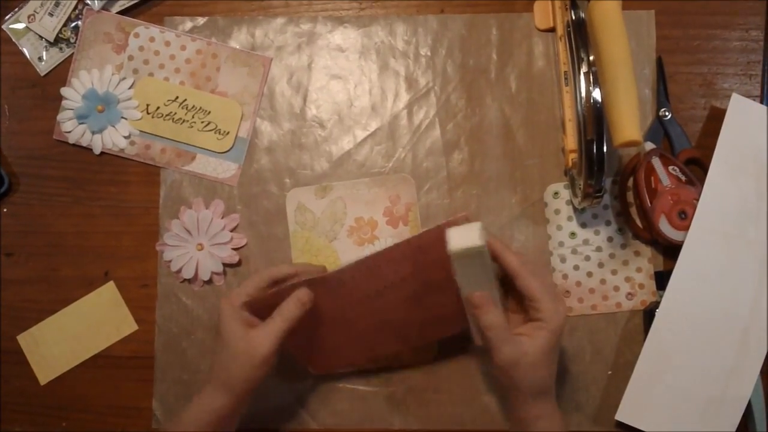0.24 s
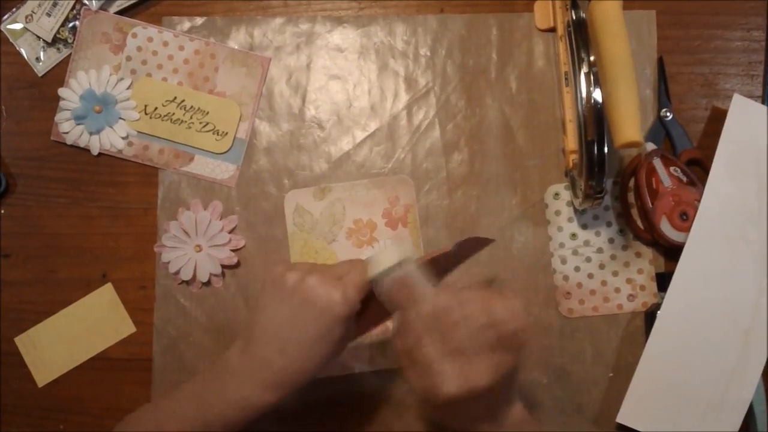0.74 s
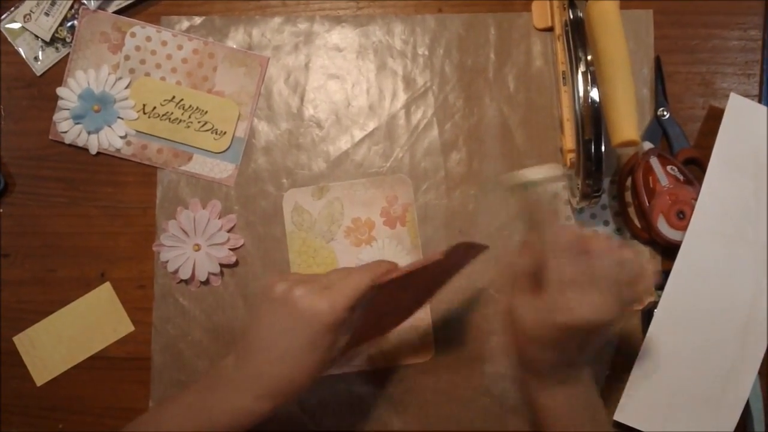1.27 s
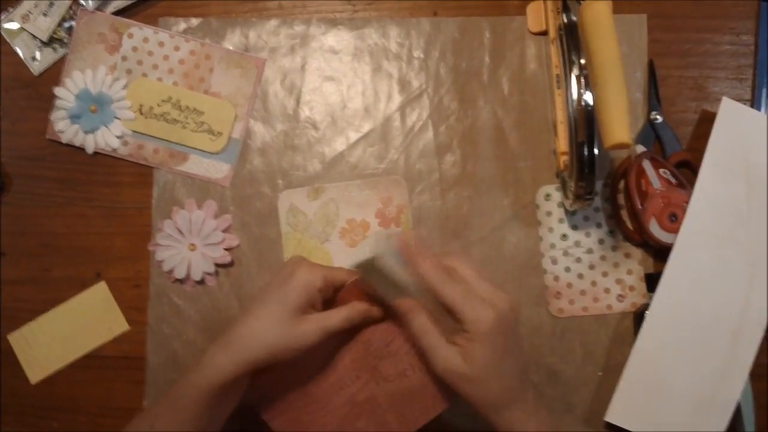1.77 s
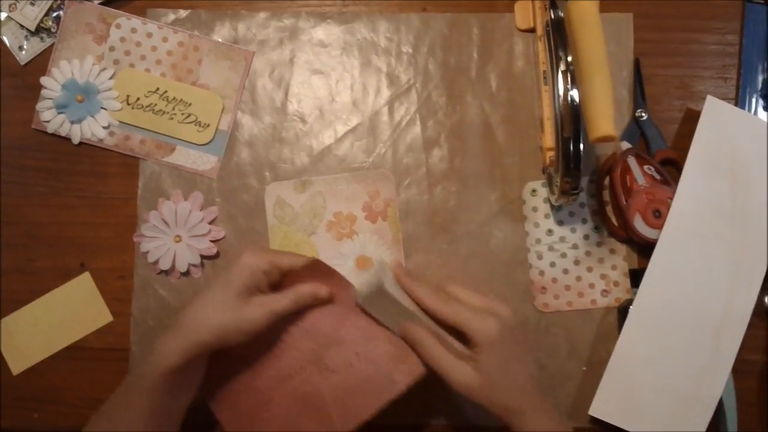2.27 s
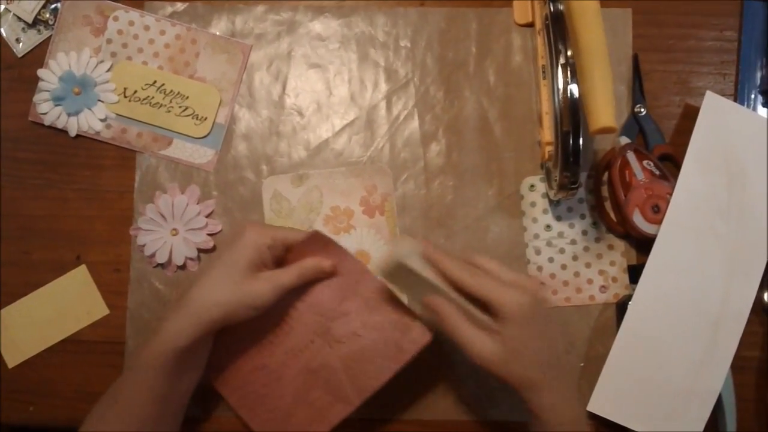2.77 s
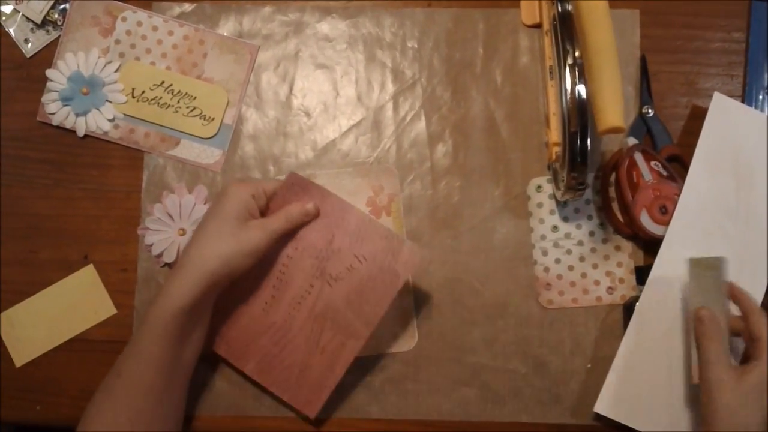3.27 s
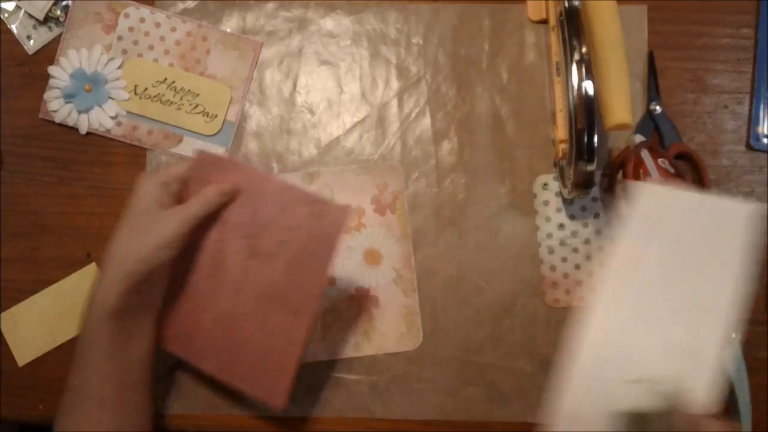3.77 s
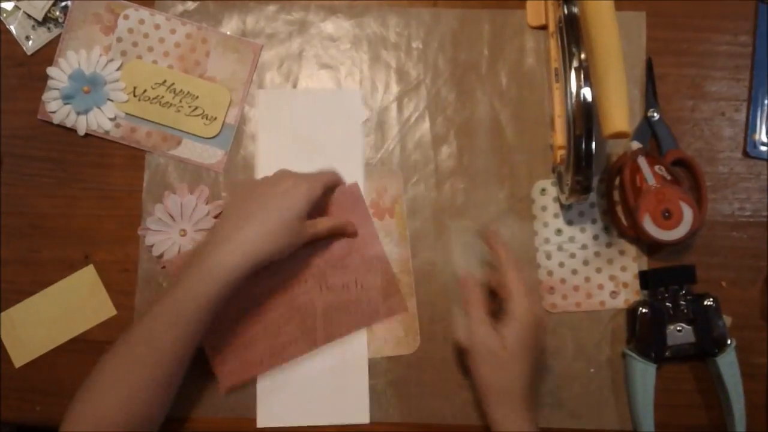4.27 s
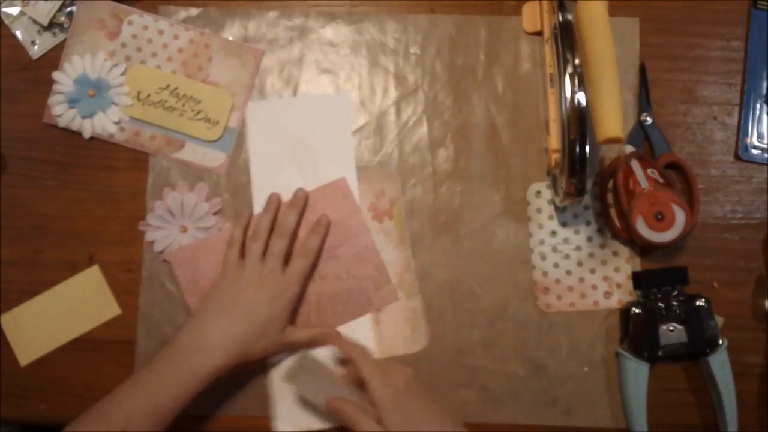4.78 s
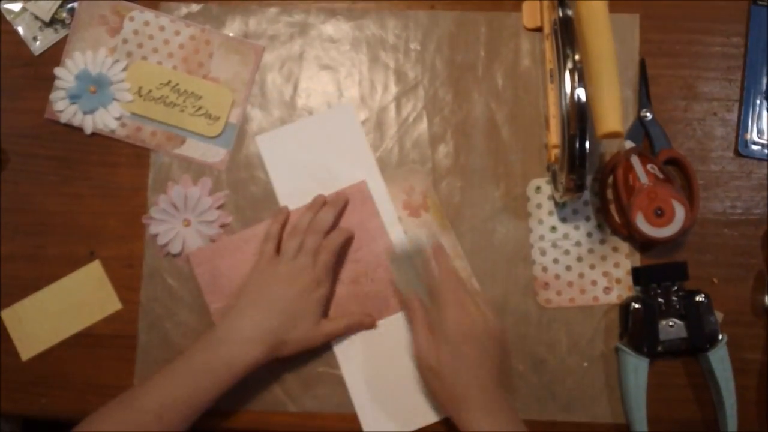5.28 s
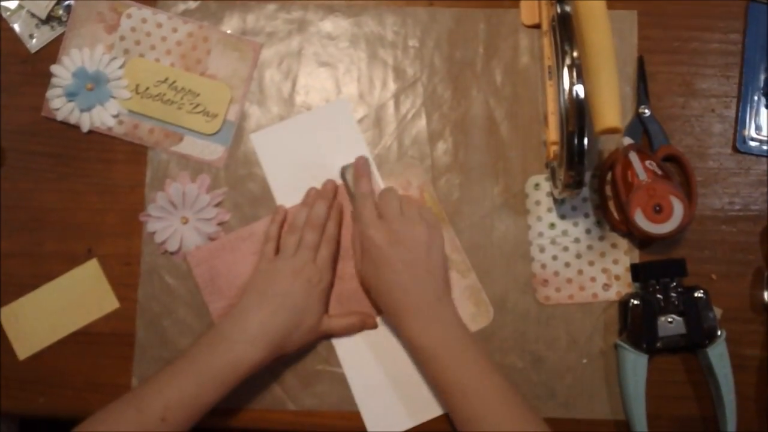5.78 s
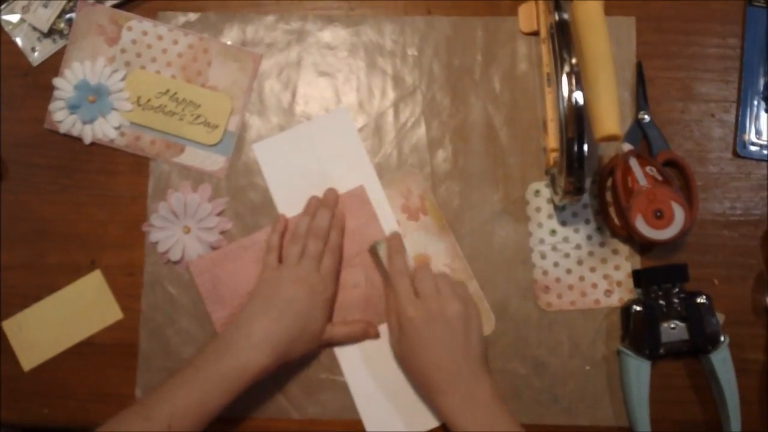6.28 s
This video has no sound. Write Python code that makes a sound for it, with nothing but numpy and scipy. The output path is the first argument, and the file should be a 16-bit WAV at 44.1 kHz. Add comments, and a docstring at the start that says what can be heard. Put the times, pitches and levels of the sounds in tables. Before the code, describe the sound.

Six quick gritty scrubs of a sanding block on card, a sharp snap, four long rasping swipes, paper shuffling, then steady back-and-forth sanding.

```python
"""A craft table in a small, faintly humming room, close to a mono microphone. Fingers slide on cardstock and
paper rustles; a sanding block gives six quick scrubs, then four long swipes to the edge of the card held in air.
A paper strip is fetched and laid down, then the card is pressed flat and sanded back and forth.
Rubbing is a dense rain of grit clicks through the card's resonances; flicks and knocks are dying modes,
paper ticks short noise puffs. Room reflections, gentle gain control and a treble notch follow."""
import sys
import numpy as np
from scipy import signal
from scipy.fft import rfft, irfft
from scipy.io import wavfile
from scipy.ndimage import uniform_filter1d

SR = 44100
rng = np.random.default_rng(int(sys.argv[2]) if len(sys.argv) > 2 else 0)


def int16_out(signal):
    """Quantize to a 16-bit WAV file."""
    q = np.round(np.clip(np.atleast_2d(signal).T, -1, 1) * 32767)
    wavfile.write(sys.argv[1], SR, q.astype(np.int16))


N = 288414
TIME = np.arange(N) / SR  # s
HZ = np.fft.rfftfreq(4096, 1 / SR)  # frequency grid of the colouring filters

# Event levels are source settings, ahead of the room and the gain control.
# Steady room noise, relative spectrum: hz, level_db
ROOM_NOISE_COLOUR = [(15, -29), (25, -21.5), (101, -2), (289, 0), (433, -7), (523, -3), (722, -7),
                     (804, -7.5), (1710, -15), (1900, -16.5), (2360, -15.5), (2560, -17.5), (6050, -20),
                     (12800, -29), (15500, -32)]
# Room hum: pitch_hz, level_db (rms)
HUM_TONES = [(120, -57.5), (258, -63.5)]
# Dying time of the room by band: hz, t60_s
ROOM_DECAY = [(150, 0.23), (1000, 0.3), (2500, 0.4), (4500, 0.29), (9000, 0.22), (15000, 0.087)]
# Near reflections from the table and walls: delay_s
REFLECTION_DELAYS = [.0023, .0041, .0067, .0094, .0122, .0153]

# Soft knocks of the block: start_s, knock_db, table_boom_db, grit_db
BLOCK_KNOCKS = [(1.2, -28.5, -62, -48), (1.777, -31.5, -56, -34.5), (1.888, -27.5, -58, -44),
                (1.963, -35, -65, -30.5), (2.123, -33, -70, -40.5), (2.461, -32.5, -60, -35),
                (2.665, -32.5, -52, -26.5), (3.299, -34, -50, -49), (3.608, -21, -45, -43),
                (3.6301, -27.5, -46, -55), (3.6426, -28, -47, -50), (3.717, -36, -46, -42.5),
                (5.343, -53, -33, -32)]
# Modes of a block knock: pitch_hz, level_db (relative), t60_s
BLOCK_MODES = [(221, -12.5, 0.077), (361, 5.5, 0.019), (483, -10, 0.052), (573, -1, 0.024),
               (770, 0.5, 0.016), (1020, -10.5, 0.074), (1470, -21, .035), (1990, -17, .03)]

# Fingers and paper slide: start_s, attack_s, hold_s, hiss_db, body_db
FINGER_SLIDES = [(0.17, 0.1, 0.12, -51, -53.5), (0.413, .005, 0.014, -48, -63),
                 (0.495, 0.026, 0.07, -47, -54), (1.489, 0.012, 0.1, -49, -61),
                 (1.62, 0.037, 0.11, -56, -53.5), (4.708, 0.015, .245, -46, -56.5),
                 (4.95, 0.024, 0.058, -52, -57), (5.051, 0.019, 0.28, -58, -69)]
# Card and paper strip are shifted: start_s, attack_s, hold_s, hiss_db, body_db
PAPER_SHUFFLES = [(3.285, .008, .035, -51, -41.5), (3.439, 0.029, 0.024, -54.5, -44.5),
                  (3.53, 0.055, 0.074, -66, -48), (3.69, 0.018, 0.037, -72, -52.5),
                  (3.965, 0.0086, 0.028, -51, -52.5), (4.045, 0.022, 0.048, -52.5, -54),
                  (4.243, 0.01, 0.038, -48.5, -52)]
# Paper crackles faintly while handled: start_s, end_s, faintest_level_db
PAPER_RUSTLES = [(0.199, 0.602, -60), (1.514, 1.759, -58), (3.417, 4.203, -57.5)]
# Paper edge catches and ticks: start_s, level_db, pitch_hz, width_hz, time_constant_s
PAPER_TICKS = [(.193, -46, 7000, 3500, .003), (0.33, -32, 5940, 2380, 0.0028),
               (0.598, -39.5, 6600, 3000, .004), (0.663, -41, 1800, 1500, 0.0037),
               (.689, -29.5, 7500, 1500, 0.0036), (1.061, -29, 1500, 5000, 0.0076),
               (1.555, -45, 4500, 3000, 0.0026), (1.648, -43, 3000, 3440, .003),
               (2.438, -46, 5000, 3000, .002), (2.853, -40, 3400, 1200, .002),
               (3.347, -48, 6000, 4000, .002), (3.484, -39, 2200, 3000, .003),
               (3.888, -48, 5000, 3000, .002), (3.972, -41.5, 1300, 900, 0.0056),
               (4.689, -37, 4080, 600, 0.0016), (4.698, -31.5, 4170, 700, 0.00065)]
# Card flicks: start_s, ring_db, pitch_factor (from the free length), crack_db
CARD_FLICKS = [(0.599, -21.5, 0.93, -48), (.920, -24, 2, -38), (1.198, -4.5, 1.02, -12.5),
               (1.8467, -9.5, 0.52, -18.5), (3.047, -24.5, 1.16, -32), (3.278, -37, 0.93, -35),
               (3.287, -21, 0.93, -31), (4.078, -20, 0.88, -35.5), (4.2523, -23.5, 1, -28)]
# Modes of a flicked card: pitch_hz, level_db (relative), t60_s
CARD_MODES = [(845, -33, 0.012), (1140, 1.5, 0.011), (1760, 1.5, 0.0034), (2450, -0.5, 0.0022),
              (2800, -2.5, 0.0031)]

# Quick scrubs in the air: start_s, attack_s, hold_s, hiss_db, body_db, pitch_factor
QUICK_SCRUBS = [(0.659, 0.023, 0.06, -41.5, -44, 1.01), (0.757, 0.03, .068, -34, -39, 1.015),
                (0.862, 0.017, 0.054, -37.5, -40.5, 0.99), (0.961, 0.019, 0.059, -30.5, -37.5, 1.025),
                (1.048, 0.028, 0.057, -33.5, -37.5, 1.02), (1.143, 0.035, 0.037, -24.5, -32.5, 1.05)]
# Long swipes off the edge: start_s, attack_s, hold_s, hiss_db, body_db, freedom (to resonate), pitch_factor
LONG_SWIPES = [(1.809, 0.058, .078, -24.5, -29, 0.57, 1.15), (2.144, 0.044, 0.12, -27, -28.5, 1.05, 1.05),
               (2.49, .036, .135, -27.5, -31.5, 0.78, 1.09), (2.861, 0.051, .16, -30.5, -33.5, 0.52, 1.08)]
# Strokes on the flat card: start_s, length_s, fastest_at (share of length), hiss_db, body_db,
# freedom (to resonate), pitch_factor
FLAT_SANDING = [(5.343, 0.098, 0.16, -32, -42, 0.88, 1.12), (5.431, 0.17, 0.35, -29, -38.5, 1.12, 1.07),
                (5.577, 0.2, 0.49, -27.5, -37, 1.14, 1.07), (5.767, 0.16, 0.42, -27, -35.5, 0.8, 1.05),
                (5.914, 0.17, .49, -26.5, -37, 0.74, 1.08), (6.068, 0.19, 0.53, -27, -36, .83, 1.02),
                (6.237, 0.21, 0.51, -26, -38.5, 0.6, 1.04), (6.43, .19, 0.48, -28.5, -36.5, 0.57, 1.04)]
# Colour of each kind of rubbing, relative spectrum: hz, level_db
SCRUB_SPECTRUM = [(200, -18), (700, -7.5), (1000, -8), (1350, 0.5), (2200, -3.5), (4000, -1.5), (7000, -8),
                  (9600, -3), (11000, -12), (15000, -21)]
# Same for the swipes: hz, level_db
SWIPE_SPECTRUM = [(150, -20), (400, -6.5), (900, 2.5), (2200, -0.5), (4000, -2.5), (6000, -4), (8300, 0.5),
                  (9200, -3), (10500, -3), (12000, -15), (15000, -17.5)]
# Same for the flat strokes: hz, level_db
FLAT_SPECTRUM = [(200, -34), (700, -17), (1250, -6.5), (2000, -8), (4500, 1), (6000, 3.5), (8000, 2),
                 (10200, 1.5), (11500, -6.5), (15000, -13)]
# Same for sliding fingers and paper: hz, level_db
SLIDE_SPECTRUM = [(500, -2.5), (2000, -5.5), (4000, -8), (7000, -4), (10000, -8), (12000, -20),
                  (15000, -21)]
# Same for shifted card and paper: hz, level_db
SHUFFLE_SPECTRUM = [(150, -29), (400, 4), (1100, 1), (2000, -5.5), (3300, -7), (5000, -12), (9000, -6.5),
                    (12000, -22), (15000, -25)]
# Card resonances in the scrubbing grip, before freedom and pitch factor: pitch_hz, width_hz, lift_db
SCRUB_RESONANCES = [(1560, 480, 6), (2410, 260, 7), (4460, 250, 8), (5550, 720, 13), (7420, 550, 13.5),
                    (8600, 550, 10.5), (9240, 680, 4.5)]
# Same in the swiping grip: pitch_hz, width_hz, lift_db
SWIPE_RESONANCES = [(650, 180, 8), (1700, 180, 2.2), (3090, 740, 8.8), (4070, 280, 3.1), (5190, 1900, 10.2),
                    (7300, 270, 2.5)]
# Same pressed flat: pitch_hz, width_hz, lift_db
FLAT_RESONANCES = [(1460, 160, 3.5), (2434, 560, 10.6), (3500, 360, 3.4), (5730, 200, 1.7),
                   (7450, 280, 2.6)]

ROOM_NOISE_DB = -50  # rms
BOOM_HZ, BOOM_T60_S = 148.4, 0.29
TURN_BOOM_DB = -46  # each turn of the block nudges the table
RUSTLES_PER_S, RUSTLE_RANGE_DB = 20, 15
CROSSOVER_HZ = 3000  # card body below, grit hiss above
SCRUB_FREEDOM = 0.73  # factor on the resonance lifts of the held card
HISS_POWER = 1.52  # hiss grows as this power of the block's speed
BODY_SPEED = 0.44  # share of top speed where the card body nears its full level
SANDING_GAIN_DB = 1.05  # added to the hiss and body levels of all sanding
DUCK_ABOVE_DB, DUCK_SHARE, RECOVER_DB_PER_S = -32.5, 0.24, 4  # the recorder's gain control
NOTCH_HZ, NOTCH_HALF_WIDTH_HZ = 12550, 380  # half amplitude this far from the centre
BAND_LIMIT_HZ = 15600


def amp(db):
    """Decibels to gain."""
    return 10 ** (np.asarray(db) / 20)


def unit(x):
    """Scales to rms 1."""
    return x / np.sqrt(np.mean(x ** 2) + 1e-20)


def read(points, hz):
    """Reads a spectrum on a log-frequency axis."""
    f, value = np.transpose(points)
    return np.interp(np.log(hz + 1), np.log(f), value)


def add(mix, s, sound):
    """Mixes a sound in at time s, cut at the end of the mix."""
    part = mix[round(s * SR):][:len(sound)]
    part += sound[:len(part)]


def colour(x, curve_db):
    """Causal (minimum-phase) filter with the given gain over HZ."""
    log_gain = np.log(amp(np.r_[curve_db, curve_db[-2:0:-1]]))
    taps = np.fft.ifft(np.exp(np.conj(signal.hilbert(log_gain)))).real
    return signal.oaconvolve(x, taps)[:len(x)]


def high_pass(x, hz):
    """Gentle cut of what a small source hardly radiates."""
    return signal.sosfilt(signal.butter(2, hz, "high", fs=SR, output="sos"), x)


def wander(n, hz):
    """Random motion fading above the given rate; one second of rms 1, repeated as needed."""
    f = np.fft.rfftfreq(SR, 1 / SR)
    motion = irfft(rfft(rng.standard_normal(SR)) / (1 + (f / hz) ** 2))
    return np.resize(unit(motion), n)


def ring(modes, pitch=1):
    """Dying modes after one blow, neighbours in opposite sense; little radiates below the lowest."""
    t = TIME[:SR // 3]
    motion = np.zeros(len(t))
    for k, (hz, db, t60) in enumerate(modes):
        decay = np.exp(-np.log(1000) * t / t60)
        motion += (-1) ** k * amp(db) * decay * np.sin(2 * np.pi * hz * pitch * t)
    return high_pass(motion / 2, 0.69 * modes[0][0] * pitch)


def burst(hz, width_hz, decay):
    """A short puff of crackle round one frequency; paper radiates no bass."""
    t = TIME[:SR // 8]
    band_db = -20 * np.log10(1 + ((HZ - hz) / width_hz) ** 2)
    noise = colour(rng.standard_normal(len(t) * 2), band_db)[len(t):]  # skips the filter's onset
    puff = high_pass(noise * np.exp(-t / decay), 220)
    return unit(puff) * np.sqrt(decay / 2 / t[-1])  # energy follows the decay time


def crack():
    """Fibres let go over a few milliseconds; total energy equals rms 1 held for one millisecond."""
    t = TIME[:512]
    fibres = rng.choice([-1., 1.], len(t)) * np.exp(-t / 0.0028)
    spectrum = [(200, -34), (1200, 9.5), (3400, 8), (6000, 4.0), (10000, -10.0), (15000, -36)]  # (Hz, dB)
    click = colour(fibres, read(spectrum, HZ))
    return click / np.linalg.norm(click) * np.sqrt(SR / 1000)


def push(attack, hold, hiss_db, body_db, hiss_sag_db_per_s, body_sag_db_per_s, release_db_per_s):
    """Hiss and body envelopes of a one-way stroke: it speeds up, the pressure eases, the contact lifts off."""
    t = TIME[:round((hold + 40 / release_db_per_s) * SR)]
    contact = np.minimum(t / attack, 1) * amp(-release_db_per_s * np.maximum(t - hold, 0))
    hiss = contact * amp(hiss_db - hiss_sag_db_per_s * t)
    body = contact * amp(body_db - body_sag_db_per_s * t)
    return hiss, body


def swing(length, fastest, hiss_db, body_db):
    """Hiss and body envelopes of a stroke between two turning points: the speed follows one skewed arch."""
    u = np.arange(0, length, 1 / SR) / length
    skew = np.log(.5) / np.log(np.clip(fastest, .1, .9))  # puts the top of the arch at this share
    speed = np.abs(np.sin(np.pi * u ** skew))
    hiss = amp(hiss_db) * speed ** HISS_POWER
    body = amp(body_db) * np.tanh((speed / BODY_SPEED) ** 2)
    return hiss, body


def rub(envelopes, shape, grains_per_s, spread_db, chatter_db, chatter_hz, patchy_db,
        modes=(), freedom=1, pitch=1):
    """Grit snags and frees paper fibres: dense tiny clicks give a hiss and ring the card."""
    hiss_gain, body_gain = envelopes
    n = len(hiss_gain)
    sizes = rng.choice([-1., 1.], n) * amp(spread_db * np.minimum(rng.exponential(1, n), 4))
    snags = sizes * (rng.random(n) < grains_per_s / SR)
    snags *= amp(chatter_db * wander(n, chatter_hz))  # the contact catches and slips unevenly
    hz, _, z = signal.stft(colour(snags, read(shape, HZ)), SR, nperseg=512)
    hz = hz[:, None]
    card_db = freedom * sum(lift / (1 + (2 * (hz - f * pitch) / width) ** 2) for f, width, lift in modes)
    # the colour shifts as the contact travels along the edge
    patches = uniform_filter1d(rng.standard_normal(z.shape), size=7, axis=0)  # across frequency
    patches = unit(uniform_filter1d(patches, size=8, axis=1))  # across time
    z = z * amp(card_db + patchy_db * patches)
    low = 1 / (1 + (hz / CROSSOVER_HZ) ** 10)
    body = unit(signal.istft(z * low, SR, nperseg=512)[1][:n])
    hiss = unit(signal.istft(z * (1 - low), SR, nperseg=512)[1][:n])
    return hiss_gain * hiss + body_gain * body


def background():
    """Steady coloured room noise and hum tones whose phase wavers slightly."""
    air = unit(colour(rng.standard_normal(N), read(ROOM_NOISE_COLOUR, HZ)))
    hum = np.zeros(N)
    for hz, db in HUM_TONES:
        phase = 2 * np.pi * hz * TIME + 0.66 * wander(N, 13)
        hum += amp(db) * np.sqrt(2) * np.sin(phase)
    return amp(ROOM_NOISE_DB) * air + hum


def reflections(x):
    """A few near reflections of alternating sign, each an equal share of the sound's energy."""
    out = np.zeros(N)
    for k, s in enumerate(REFLECTION_DELAYS):
        add(out, s, (-1) ** k * x)
    return out / np.sqrt(len(REFLECTION_DELAYS))


def room(x):
    """The tail of the small room: sparse random echoes dying band by band."""
    t = TIME[:SR // 2]
    echoes = rng.choice([-1., 1.], len(t)) * (rng.random(len(t)) < 4000 / SR)  # 4000 per second
    echoes = echoes * (t > .006)
    hz, frame_s, z = signal.stft(echoes, SR, nperseg=256)
    decay = np.exp(-np.log(1000) * frame_s / read(ROOM_DECAY, hz)[:, None])
    tail = signal.istft(z * decay, SR, nperseg=256)[1][:len(t)]
    return signal.fftconvolve(x, tail / np.linalg.norm(tail))[:N]


def table():
    """The table top booms as one dying mode under landings, and faintly whenever the block turns round."""
    boom = np.minimum(TIME / 0.008, 1) * amp(-60 * TIME / BOOM_T60_S) * np.sin(2 * np.pi * BOOM_HZ * TIME)
    out = np.zeros(N)
    for s, _, boom_db, _ in BLOCK_KNOCKS:
        add(out, s, amp(boom_db) * boom)
    for s, *_ in FLAT_SANDING[1:]:
        add(out, s, amp(TURN_BOOM_DB) * boom)
    return out


def knocks():
    """The block lands: a dull knock of dying modes and a scratch of grit."""
    out = np.zeros(N)
    for s, knock_db, _, grit_db in BLOCK_KNOCKS:
        add(out, s, amp(knock_db) * ring(BLOCK_MODES))
        add(out, s, amp(grit_db) * burst(1900, 4000, 0.0016))
    return out


def handling():
    """Fingers slide on the card; the paper strip is lifted, rustles and is dragged across the table."""
    out = np.zeros(N)
    for s, *move in FINGER_SLIDES:
        envelopes = push(*move, hiss_sag_db_per_s=2.5, body_sag_db_per_s=10, release_db_per_s=262.5)
        add(out, s, rub(envelopes, SLIDE_SPECTRUM, grains_per_s=12000, spread_db=2.5,
                        chatter_db=1.9, chatter_hz=50, patchy_db=2.6))
    for s, *move in PAPER_SHUFFLES:
        envelopes = push(*move, hiss_sag_db_per_s=15, body_sag_db_per_s=18, release_db_per_s=153.5)
        add(out, s, rub(envelopes, SHUFFLE_SPECTRUM, grains_per_s=3000, spread_db=3.0,
                        chatter_db=0.4, chatter_hz=60, patchy_db=-2.0))
    for start, end, faintest_db in PAPER_RUSTLES:
        for when, size, pitch in rng.random((round(RUSTLES_PER_S * (end - start)), 3)):
            crackle = burst(1500 + 5000 * pitch, 2700, 0.0039)
            add(out, start + when * (end - start), amp(faintest_db + RUSTLE_RANGE_DB * size) * crackle)
    return out


def ticks():
    """The paper edge catches: each tick is a brief puff of noise."""
    out = np.zeros(N)
    for s, db, hz, width, decay in PAPER_TICKS:
        add(out, s, amp(db) * burst(hz, width, decay))
    return out


def flicks():
    """The card springs off the block or a finger: a crack and a brief ring."""
    out = np.zeros(N)
    for s, ring_db, pitch, crack_db in CARD_FLICKS:
        add(out, s, amp(ring_db) * ring(CARD_MODES, pitch))
        add(out, s, amp(crack_db) * crack())
    return out


def sanding():
    """The block rubs grit along the card's edge: scrubbed, swiped, then worked flat on the table."""
    out = np.zeros(N)
    for s, *stroke, pitch in QUICK_SCRUBS:
        envelopes = push(*stroke, hiss_sag_db_per_s=15, body_sag_db_per_s=30, release_db_per_s=333)
        add(out, s, rub(envelopes, SCRUB_SPECTRUM, grains_per_s=20000, spread_db=1.2,
                        chatter_db=0.1, chatter_hz=150, patchy_db=0.9,
                        modes=SCRUB_RESONANCES, freedom=SCRUB_FREEDOM, pitch=pitch))
    for s, *stroke, freedom, pitch in LONG_SWIPES:
        envelopes = push(*stroke, hiss_sag_db_per_s=37, body_sag_db_per_s=78, release_db_per_s=200.5)
        add(out, s, rub(envelopes, SWIPE_SPECTRUM, grains_per_s=10000, spread_db=2.0,
                        chatter_db=0.8, chatter_hz=150, patchy_db=1.74,
                        modes=SWIPE_RESONANCES, freedom=freedom, pitch=pitch))
    for s, *stroke, freedom, pitch in FLAT_SANDING:
        add(out, s, rub(swing(*stroke), FLAT_SPECTRUM, grains_per_s=18000, spread_db=0.0,
                        chatter_db=0.45, chatter_hz=150, patchy_db=1.5,
                        modes=FLAT_RESONANCES, freedom=freedom, pitch=pitch))
    return amp(SANDING_GAIN_DB) * out


def scene():
    """All sources in one small room, the same in both channels."""
    thuds = knocks()
    snaps = ticks() + flicks()
    rubbing = handling() + sanding()
    near = reflections(amp(-11.5) * snaps + amp(-8.5) * thuds)
    tail = room(amp(-11.5) * rubbing + amp(-8.5) * snaps + amp(-3.5) * thuds)
    mono = background() + table() + thuds + snaps + rubbing + near + tail
    return np.array([mono, mono])


def gain_control(x):
    """The recorder turns the gain down quickly under loud strokes and lets it creep back."""
    power = uniform_filter1d((x ** 2).mean(0), size=440)  # over 10 ms
    power_db = 10 * np.log10(abs(power) + 1e-12)
    cut_db = DUCK_SHARE * np.maximum(power_db - DUCK_ABOVE_DB, 0)
    creep_db = RECOVER_DB_PER_S * TIME
    held_db = np.maximum.accumulate(cut_db + creep_db) - creep_db
    return x * amp(-uniform_filter1d(held_db, size=220))


def record(dry):
    """Gain control, the microphone's narrow notch in the high treble, then the band limit."""
    f = np.fft.rfftfreq(N, 1 / SR)
    offset = (f - NOTCH_HZ) ** 2
    notch = offset / (offset + NOTCH_HALF_WIDTH_HZ ** 2)
    heard = irfft(rfft(gain_control(dry)) * notch, N)
    low_pass = signal.firwin(511, BAND_LIMIT_HZ, window=("kaiser", 9), fs=SR)
    return signal.oaconvolve(heard, low_pass[None], "same")


dry = scene()
out = record(dry)
int16_out(out)
```